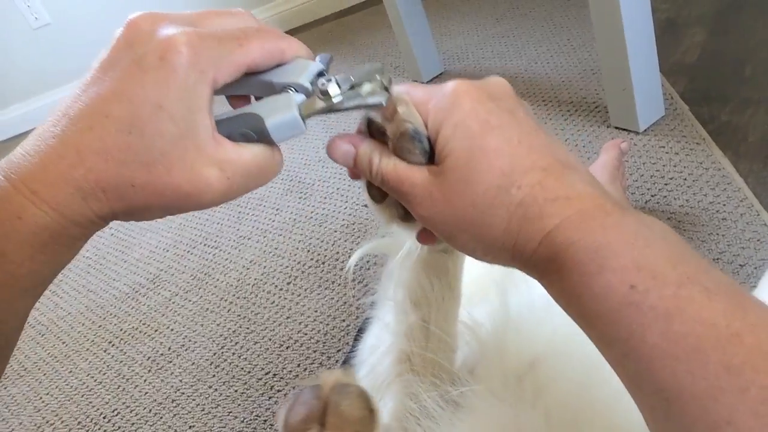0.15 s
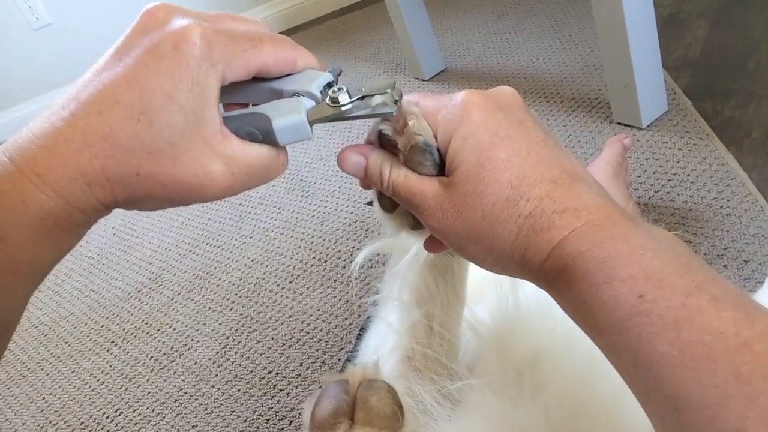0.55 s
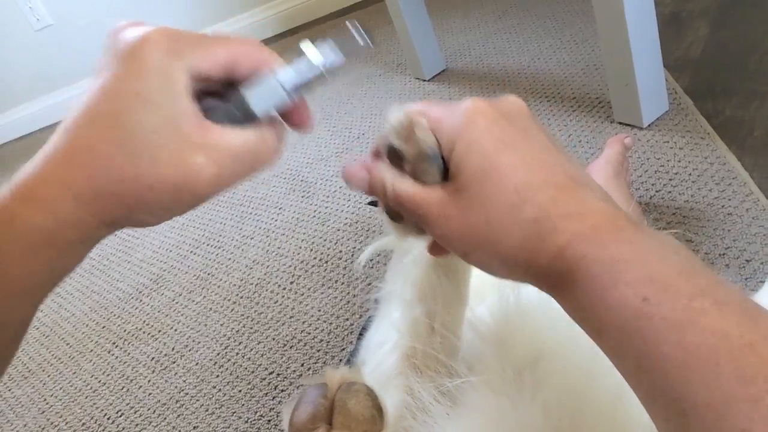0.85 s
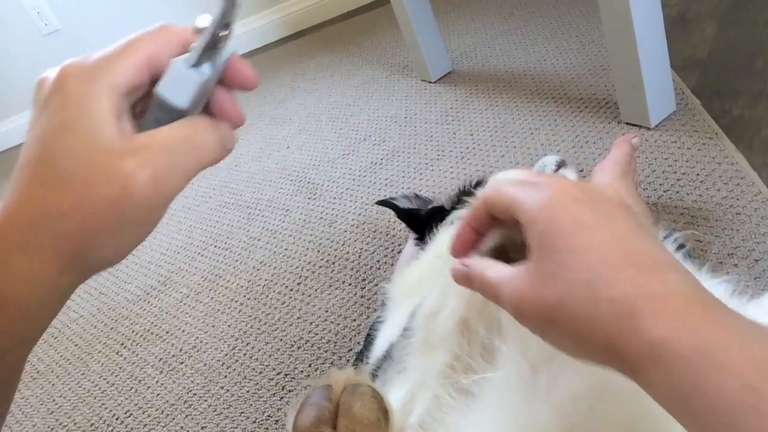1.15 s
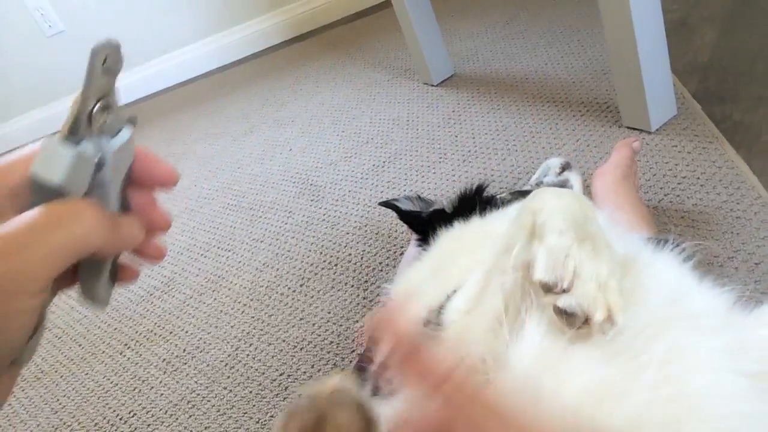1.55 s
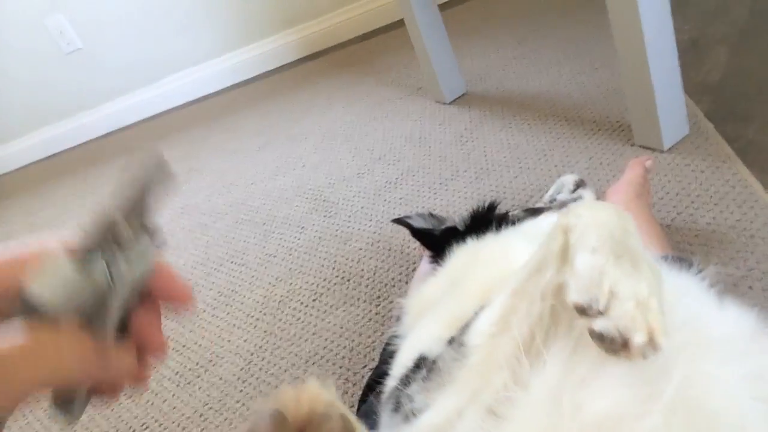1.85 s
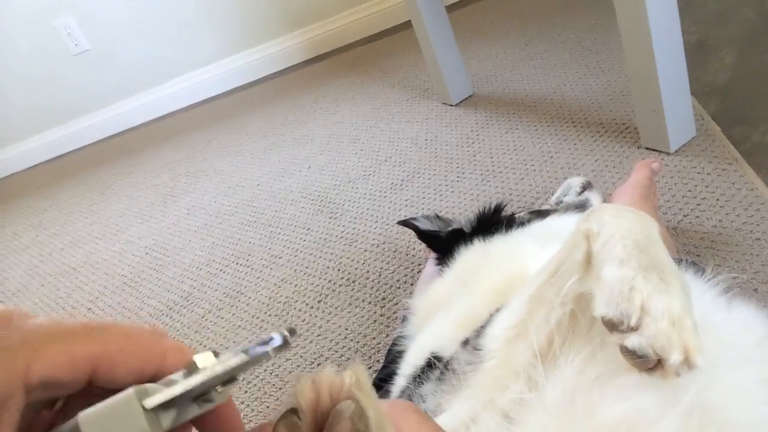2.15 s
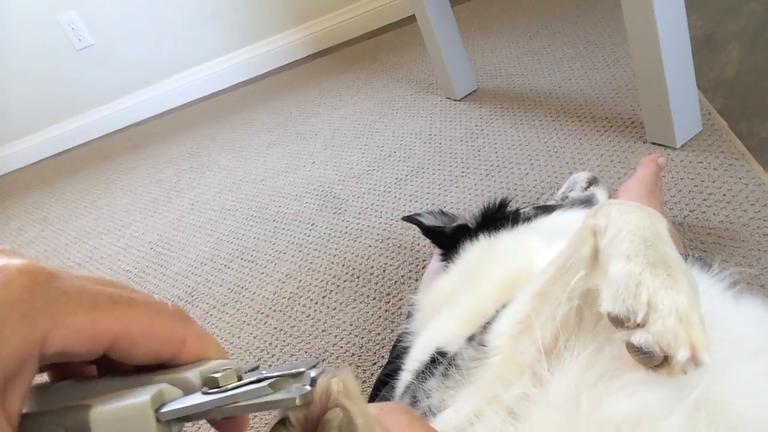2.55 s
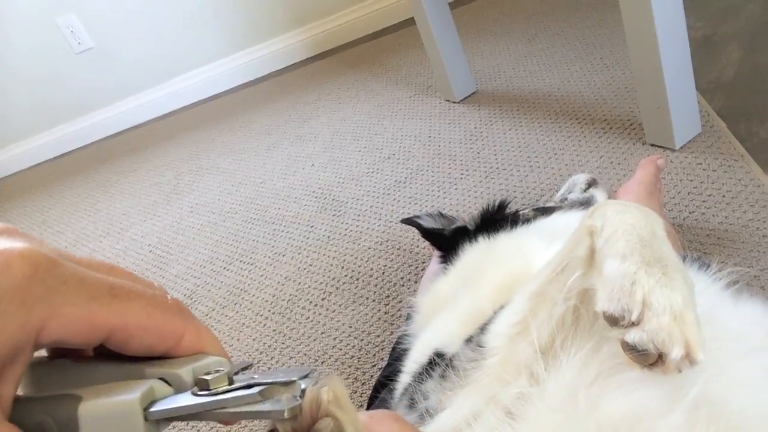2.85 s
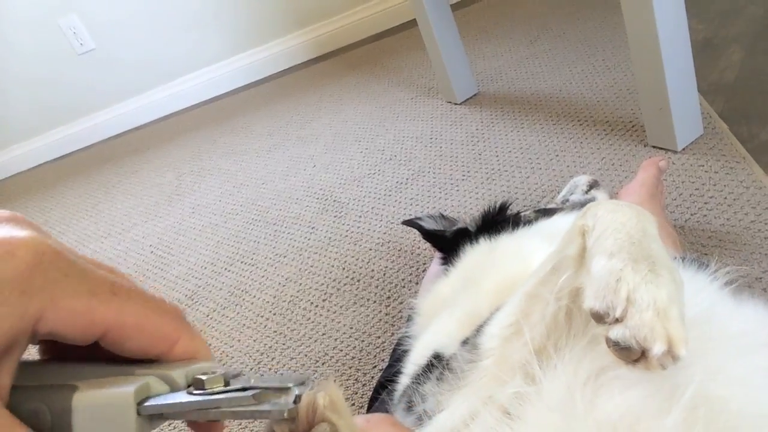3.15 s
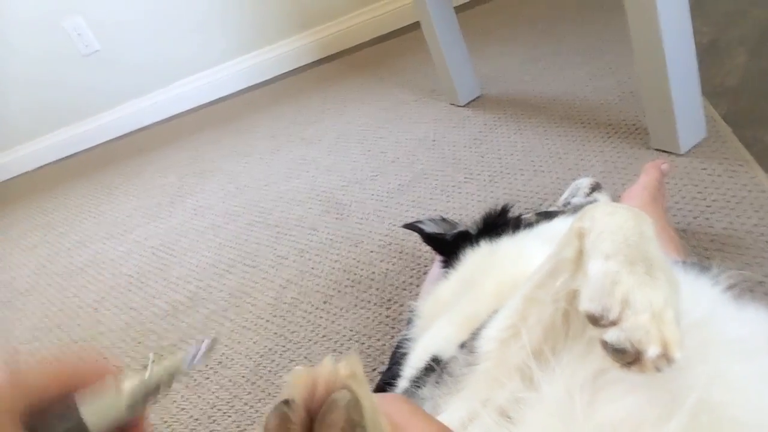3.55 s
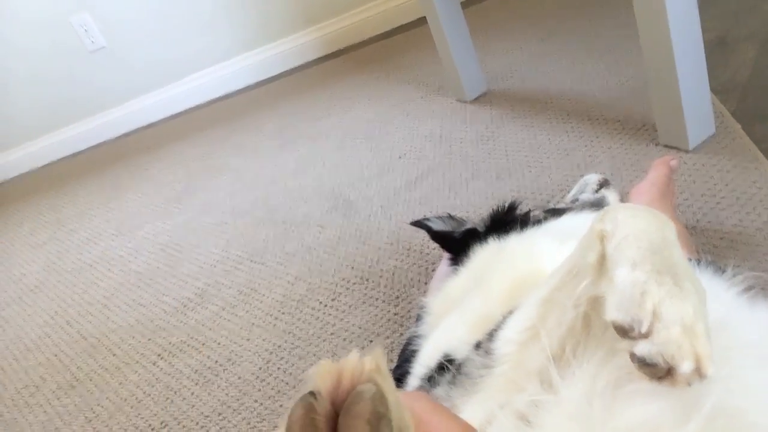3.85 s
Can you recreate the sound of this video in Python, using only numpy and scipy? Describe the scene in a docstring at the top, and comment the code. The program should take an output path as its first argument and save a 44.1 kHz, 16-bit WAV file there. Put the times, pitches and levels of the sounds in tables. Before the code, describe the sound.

Nail clippers snip and crack through a dog's claw, then two dull bumps, in a quiet room.

```python
"""A quiet carpeted room: plier-type nail clippers trim a dog's claws at close range.
A light snip, then a hard cut that cracks through the claw in stages; each crack rings the clippers.
The handles tap, blade and spring tick, and hands brush the fur over room air and a faint hum.
Two dull bumps close by end the scene, the second with a sharp clack."""
import sys
import numpy as np
from scipy import signal
from scipy.fft import rfft, irfft
from scipy.io import wavfile
from scipy.ndimage import uniform_filter1d

SR = 44100
rng = np.random.default_rng(int(sys.argv[2]) if len(sys.argv) > 2 else 0)


def dump(signal):
    """Clip the signal to [-1, 1] and save it as 16-bit WAV at the path in sys.argv[1]."""
    limited = np.clip(np.atleast_2d(signal).T, -1, 1)
    pcm = np.round(limited * 32767).astype(np.int16)
    wavfile.write(sys.argv[1], SR, pcm)


N = 176400
TIME_S = np.arange(N) / SR


def undb(db):
    """Decibels to gain."""
    return 10 ** (np.asarray(db) / 20)


def unit(x):
    """Scale to rms 1."""
    return x / np.sqrt(np.mean(x ** 2) + 1e-30)


def envelope(points):
    """Gain along (t/s, level/dB) points, silent outside them."""
    s, db = np.array(points).T
    return undb(np.interp(TIME_S, s, db, left=-150, right=-150))


def shaped_noise(spectrum):
    """Noise shaped by (f/Hz, level/dB) points, rms 1."""
    hz, db = np.array(spectrum).T
    f = np.maximum(np.fft.rfftfreq(N, 1 / SR), 1)
    gain = undb(np.interp(np.log(f), np.log(hz), db))
    return unit(irfft(rfft(rng.standard_normal(N)) * gain, N))


def band_noise(hz, width_hz):
    """Noise in one resonance, rms 1."""
    f = np.fft.rfftfreq(N, 1 / SR)
    gain = 1 / (1 + (2 * (f - hz) / width_hz) ** 2)
    return unit(irfft(rfft(rng.standard_normal(N)) * gain, N))


def drift(rate_hz):
    """Smooth random drift, rms 1."""
    hold = int(SR / rate_hz)
    steps = np.repeat(rng.standard_normal(N // hold + 1), hold)
    return unit(uniform_filter1d(uniform_filter1d(steps, hold), hold)[:N])


def decay(t, t60):
    """Exponential fall, 60 dB per t60."""
    return np.exp(-np.log(1000) * t / t60)


def ring(modes, push_s):
    """Damped modes after a short push, with the energy of 3 ms at level 1."""
    t = np.arange(SR // 10) / SR
    y = sum((-1) ** k * undb(db) * np.sin(2 * np.pi * hz * t) * decay(t, t60)
            for k, (hz, db, t60) in enumerate(modes))
    y *= 1 - np.exp(-t / push_s)
    return y / np.sqrt(np.sum(y ** 2) / (.003 * SR))


def add(out, start_s, y):
    """Mix y into out at start_s."""
    i = int(start_s * SR)
    out[i:i + len(y)] += y[:max(N - i, 0)]


def strike(events, modes, push_s):
    """Ring one set of modes at each (t/s, level/dB) event."""
    out = np.zeros(N)
    for s, db in events:
        add(out, s, undb(db) * ring(modes, push_s))
    return out


# diffuse tail: f/Hz, level/dB, t60/s
TAIL_BANDS = [(150, -0.5, 0.46), (500, 1.5, 0.26), (1100, -1.5, 0.32), (1740, -6, 0.29), (2060, 3, 0.37),
              (2530, 1.5, 0.38), (2880, 3.5, 0.3), (4500, -1, .38), (6700, -6.5, 0.44), (9200, 0.5, 0.24),
              (11000, -5, 0.39), (14500, 4, 0.32)]
# nearby surfaces: delay/s, level/dB
REFLECTIONS = [(.0062, -37), (0.01, -23), (.0128, -34), (.0178, -37)]
def room(dry, tail_db, build_s=.0056):
    """Direct sound, a few near reflections and a short diffuse tail."""
    t = np.arange(SR // 2) / SR
    log_f = np.log(np.maximum(np.fft.rfftfreq(len(t), 1 / SR), 1))
    log_centres = np.log([hz for hz, _, _ in TAIL_BANDS])
    noise = rfft(rng.standard_normal(len(t)))
    tail = np.zeros(len(t))
    for (_, db, t60), weights in zip(TAIL_BANDS, np.eye(len(TAIL_BANDS))):
        band = irfft(noise * np.interp(log_f, log_centres, weights), len(t))
        tail += undb(db) * band * decay(t, t60)
    tail *= 1 - np.exp(-(t / build_s) ** 2)
    response = undb(tail_db) * tail / np.sqrt(np.sum(tail ** 2))
    for delay_s, db in REFLECTIONS:
        response[int(delay_s * SR)] += undb(db)
    return dry + signal.fftconvolve(dry, response)[:N]


# room air, relative density: f/Hz, level/dB
AIR_SPECTRUM = [(15, -48.5), (25, -13), (69, -2), (186, -4), (278, -11.5), (318, -9), (475, -13.5),
                (588, -11.5), (833, -18.5), (1060, -19), (1630, -23.5), (2070, -26), (2930, -29),
                (4260, -29), (15000, -36)]
# hum: f/Hz, width/Hz, level/dB
HUM_BANDS = [(144.6, 14, -77.5), (319, 45, -83.5), (587.5, 22, -87)]
# brief tone: t/s, level/dB
TONE_ENVELOPE = [(1.36, -92), (1.385, -69.5), (1.42, -68), (1.445, -86), (1.48, -75), (1.56, -80),
                 (1.65, -87)]
def background(air_db=-69.5, tone_hz=590):
    """Quiet room air, a wavering hum and one faint tone."""
    air = undb(air_db) * shaped_noise(AIR_SPECTRUM)
    hum = sum(undb(db) * band_noise(hz, width_hz) for hz, width_hz, db in HUM_BANDS)
    phase = 2 * np.pi * tone_hz * TIME_S + .5 * drift(rate_hz=24.8)
    tone = np.sqrt(2) * envelope(TONE_ENVELOPE) * np.sin(phase)
    return air + hum + tone


# arm movement: t/s, level/dB
ARM_ENVELOPE = [(0, -88), (1.0, -80), (2.0, -75), (2.6, -74.5), (3.3, -71), (3.7, -73), (4.0, -71)]
def arms():
    """Shifting arms make a low rumble."""
    return band_noise(hz=85, width_hz=120) * envelope(ARM_ENVELOPE)


# fur hiss, relative density: f/Hz, level/dB
FUR_SPECTRUM = [(150, -11), (400, -4.5), (1100, 0), (1800, -3.5), (3500, -5), (5500, -6), (7600, -5),
                (9000, -10), (15000, -14)]
# hands brushing fur: t/s, level/dB
BRUSH_ENVELOPE = [(0, -85.5), (.65, -85.5), (.85, -77.5), (.97, -77.5), (1.15, -74.5), (1.42, -74),
                  (1.6, -72.5), (1.85, -80), (2.12, -82), (2.25, -86), (3.0, -87.5), (3.15, -84.5),
                  (3.52, -73.5), (3.62, -80.5), (4.0, -76)]
# single strokes: t/s, length/s, f/Hz, width/Hz, level/dB
COAT_STROKES = [(.78, .06, 1100, 396, -79), (0.783, 0.037, 5100, 900, -80), (1.01, 0.018, 4700, 600, -79),
                (1.464, 0.081, 1070, 496, -77.5), (1.54, 0.055, 3500, 2610, -72.5),
                (1.746, 0.026, 8040, 7060, -71), (2.12, .1, 7000, 3000, -82.5)]
def fur(grain_db=3, patchy_db=1.23):
    """Hairs slip under the hands: a grainy hiss with a few single strokes."""
    hiss = shaped_noise(FUR_SPECTRUM) * envelope(BRUSH_ENVELOPE)
    for s, length_s, hz, width_hz, db in COAT_STROKES:
        swell = np.exp(-2 * ((TIME_S - s) / length_s) ** 2)
        hiss += undb(db) * band_noise(hz, width_hz) * swell
    flicker_db = grain_db * drift(rate_hz=900) + patchy_db * drift(rate_hz=25)
    return hiss * unit(undb(flicker_db))


# bumped object: f/Hz, level/dB, t60/s
OBJECT_MODES = [(200, -14, .018), (414, 1, 0.01), (544, 0.5, 0.0066)]
# knocks: t/s, level/dB
KNOCKS = [(3.9527, -20), (3.9818, -25)]
def bumps(top_hz=835):
    """Two soft, heavy knocks ring an object's low modes."""
    lowpass = signal.butter(6, top_hz, fs=SR, output="sos")
    return signal.sosfilt(lowpass, strike(KNOCKS, OBJECT_MODES, push_s=.0014))


# hard contact: f/Hz, level/dB, t60/s
CONTACT_MODES = [(1090, 0, 0.0036), (1766, 0.5, 0.0032), (2560, -3.5, 0.0025), (5500, -6, 0.0012),
                 (7100, -9.5, 0.0028), (11480, -9, 0.0017)]
def clack(at_s=3.982, level_db=-28):
    """The second knock lands on something hard."""
    return strike([(at_s, level_db)], CONTACT_MODES, push_s=.00005)


# handles: f/Hz, level/dB, t60/s
GRIP_MODES = [(720, 2, 0.0051), (990, 2.5, 0.012), (1390, 0.5, 0.0066), (3160, -3, 0.0024)]
# taps: t/s, level/dB
GRIP_TAPS = [(.1324, -55), (2.4436, -58.5), (3.6665, -54.5)]
def handle_taps():
    """The handles tap as they shift in the grip."""
    return strike(GRIP_TAPS, GRIP_MODES, push_s=.0001)


# blade and spring: f/Hz, level/dB, t60/s
BLADE_MODES = [(1700, -2.5, 0.0054), (5380, -5, .006), (7360, -1, .005), (8100, -3.5, .004),
               (10800, -4, .004), (13500, -17, .003)]
# ticks: t/s, level/dB
BLADE_TICKS = [(.728, -70), (.857, -71.5), (.8985, -60), (3.085, -75), (3.132, -77), (3.172, -72.5),
               (3.667, -59), (3.953, -72), (3.9705, -88)]
def blade_ticks():
    """Blade and spring tick with a brief, high ring."""
    return strike(BLADE_TICKS, BLADE_MODES, push_s=.00007)


# hand and paw: f/Hz, level/dB, t60/s
HAND_MODES = [(74.6, -1.5, .08), (125, -2, .05)]
def jolt(at_s=3.278, level_db=-46):
    """Hand and paw thud as the claw gives way."""
    return strike([(at_s, level_db)], HAND_MODES, push_s=.001)


# clippers and claw: f/Hz, level/dB, t60/s
CUT_MODES = [(640, -10, 0.0063), (1020, -4.5, 0.0074), (1590, -6.5, 0.0064), (2027, -7.5, 0.0089),
             (2357, -4, .01), (3100, -6, 0.0044), (4030, -7, 0.0062), (4780, -5, 0.004),
             (5400, -7.5, 0.00503), (6290, -3, 0.0073), (6930, -3.5, 0.0076), (7870, -2, 0.0047),
             (9040, -8, 0.0045), (10700, -11.5, 0.0058), (13700, -12, .002)]
def clipper_ring(body_db, mid_db, edge_db, t60_factor=1):
    """One contact rings clippers and claw, with its own balance of body, middle and blade-edge modes."""
    modes = []
    for hz, db, t60 in CUT_MODES:
        boost_db = body_db * (hz < 1750) + mid_db * (2700 < hz < 5200) + edge_db * (hz > 6600)
        modes.append((hz, db + boost_db, t60 * t60_factor))
    return ring(modes, push_s=.00005)


# claw crumbling under the blade: t/s, level/dB
CRUNCH_ENVELOPE = [(3.245, -86), (3.255, -72), (3.273, -59.5), (3.277, -42), (3.283, -49.5), (3.30, -60.5),
                   (3.328, -48), (3.338, -63), (3.37, -76)]
def crunch(fractures_per_s=5000):
    """Dense tiny fractures around the hard cut ring the clippers."""
    fractures = (rng.random(N) < fractures_per_s / SR) * rng.standard_normal(N)
    response = clipper_ring(body_db=4.5, mid_db=3, edge_db=-5)
    return unit(signal.fftconvolve(fractures, response)[:N]) * envelope(CRUNCH_ENVELOPE)


# claw cracks: t/s, level/dB, body/dB, middle/dB, edge/dB, t60 factor
CRACKS = [(0.8179, -41.5, -13.5, 4, -21, 1.08), (3.2776, -26.5, 7, -2, 5, 0.99),
          (3.2983, -26.5, -22.5, -0.5, 1.5, 0.82), (3.3127, -37, 6, -3, -3, 1.3),
          (3.3236, -48.5, 12, -6, 9, 1.), (3.3278, -45, 15, -6, -11, 1.5)]
def snips():
    """The claw cracks once in the light snip and in stages in the hard cut, ringing the clippers."""
    out = np.zeros(N)
    for s, db, body_db, mid_db, edge_db, t60_factor in CRACKS:
        add(out, s, undb(db) * clipper_ring(body_db, mid_db, edge_db, t60_factor))
    return out


def scene():
    """Clippers and knocks with room reflections, over dry fur, arms and background."""
    clippers = room(handle_taps() + blade_ticks() + jolt() + crunch() + snips(), tail_db=-17)
    knocks = room(bumps(), tail_db=-7.5) + room(clack(), tail_db=-5.5)
    return (clippers + knocks + fur() + arms() + background())[None]


def record(dry, low_cut_hz=38, top_hz=15200):
    """Gentle bass roll-off, steep treble cut."""
    highpass = signal.butter(2, low_cut_hz, "high", fs=SR, output="sos")
    lowpass = signal.ellip(10, .2, 60, top_hz, fs=SR, output="sos")
    return signal.sosfilt(lowpass, signal.sosfilt(highpass, dry))


dry = scene()
out = record(dry)
dump(out)
```